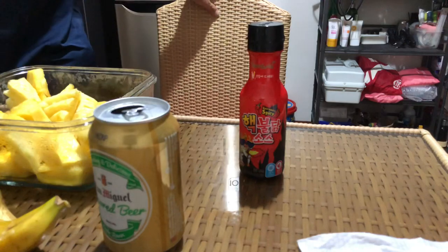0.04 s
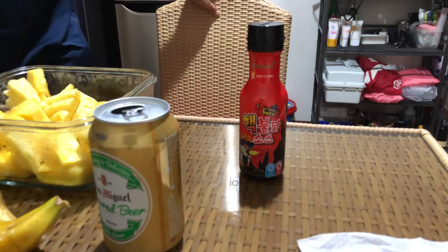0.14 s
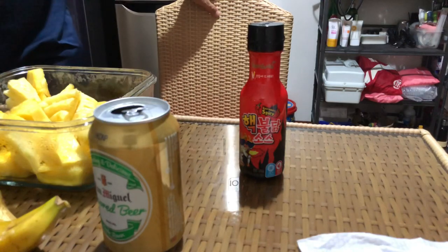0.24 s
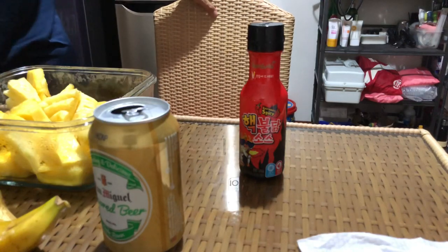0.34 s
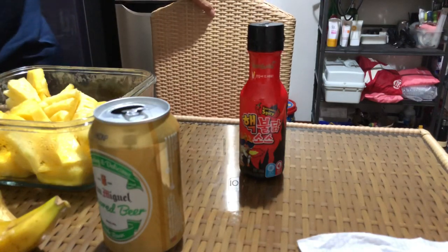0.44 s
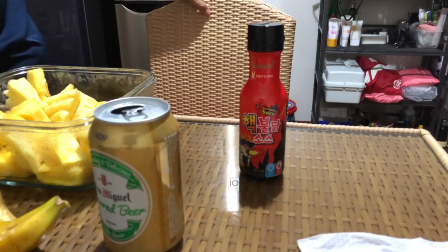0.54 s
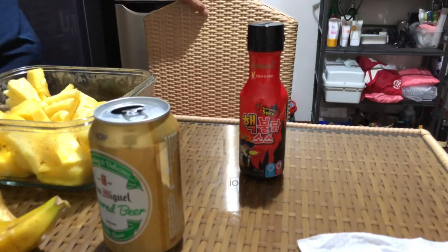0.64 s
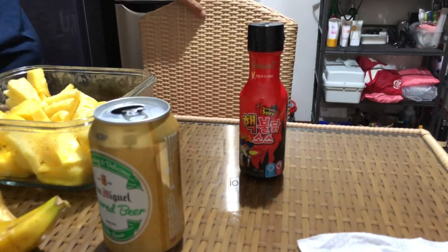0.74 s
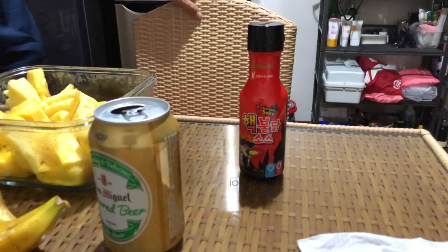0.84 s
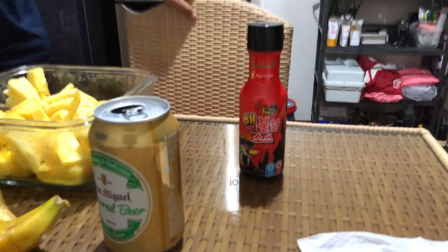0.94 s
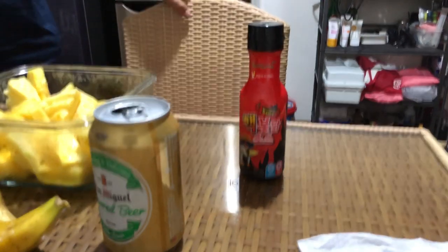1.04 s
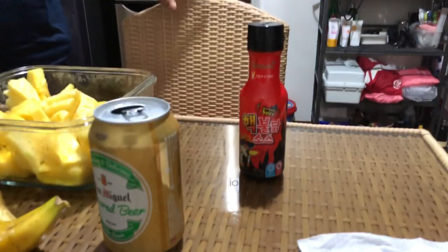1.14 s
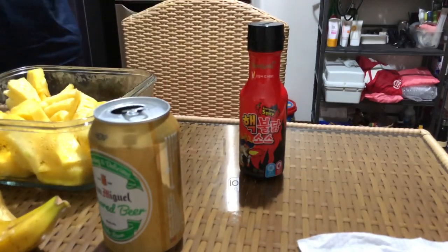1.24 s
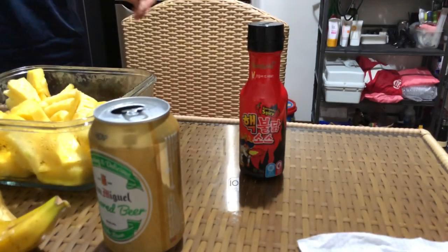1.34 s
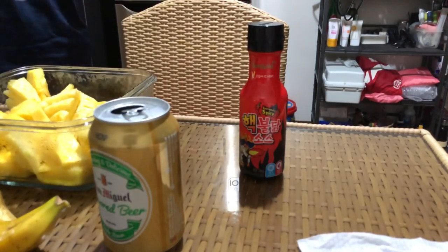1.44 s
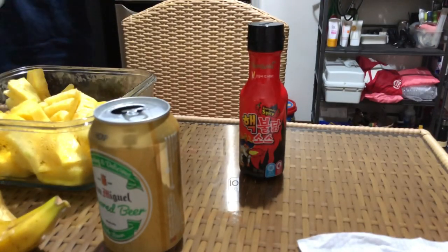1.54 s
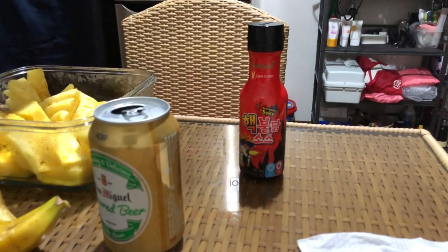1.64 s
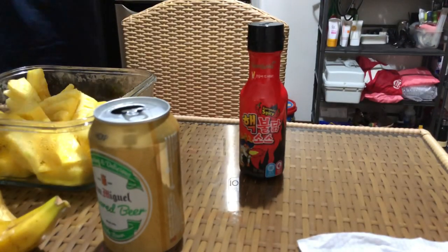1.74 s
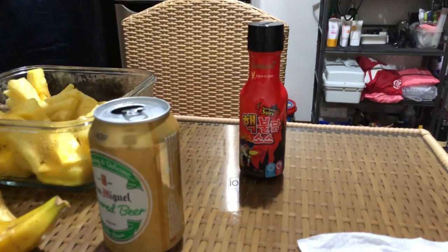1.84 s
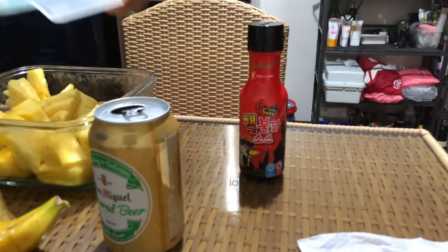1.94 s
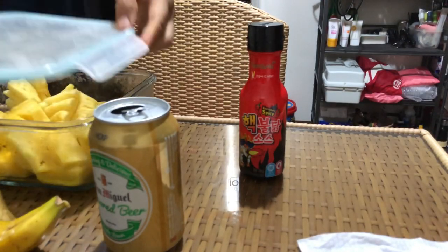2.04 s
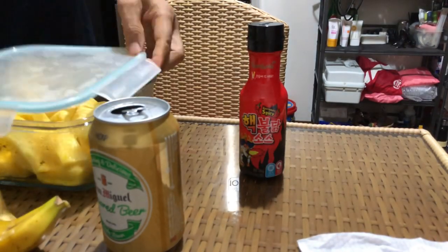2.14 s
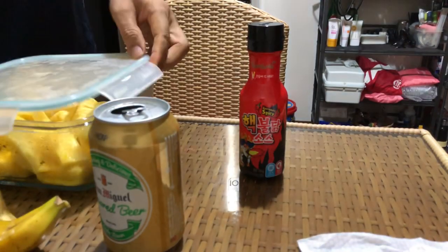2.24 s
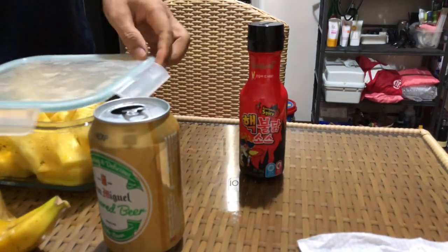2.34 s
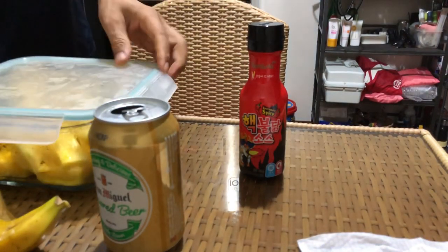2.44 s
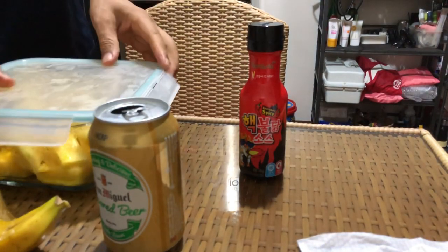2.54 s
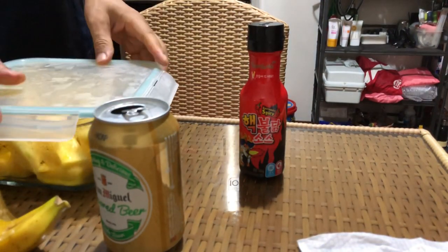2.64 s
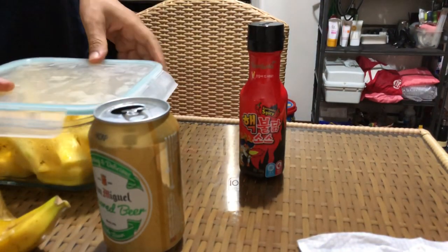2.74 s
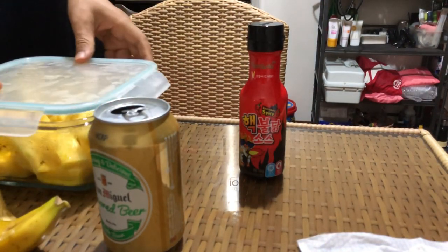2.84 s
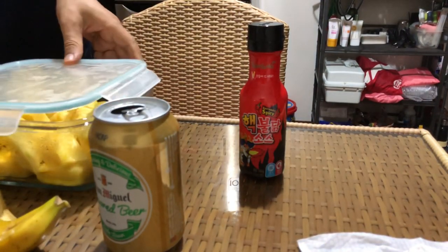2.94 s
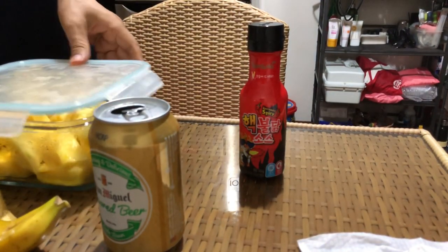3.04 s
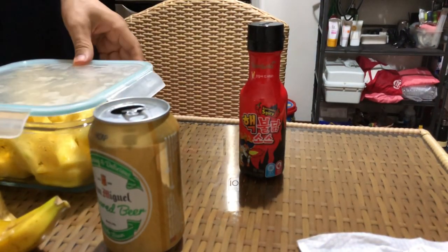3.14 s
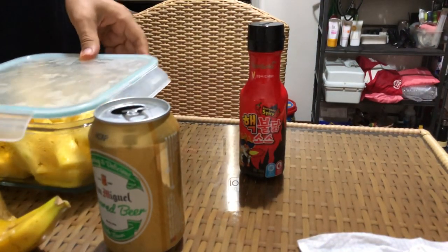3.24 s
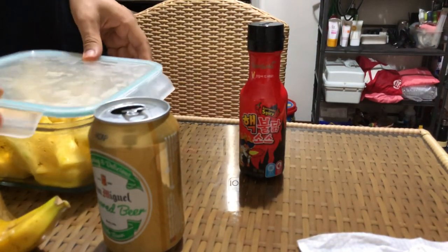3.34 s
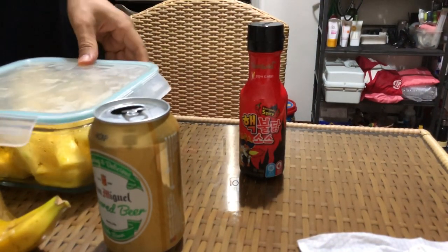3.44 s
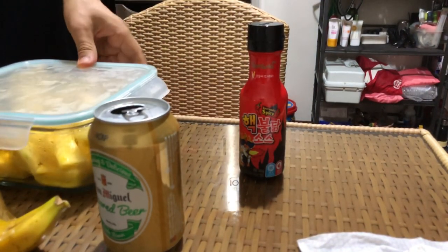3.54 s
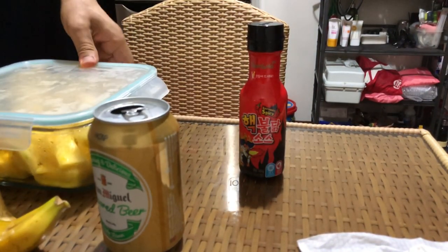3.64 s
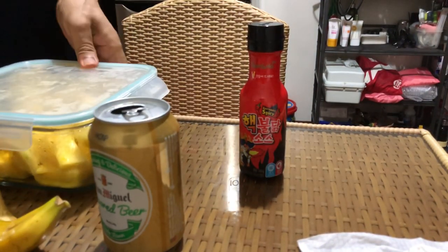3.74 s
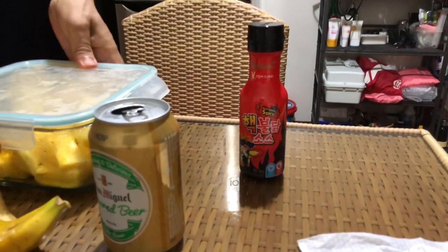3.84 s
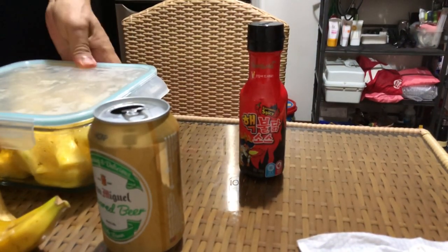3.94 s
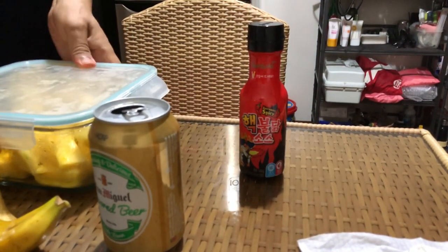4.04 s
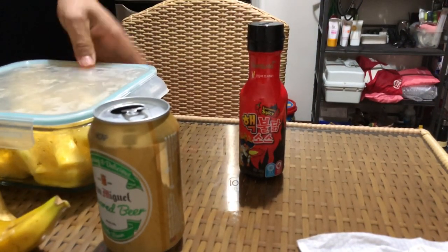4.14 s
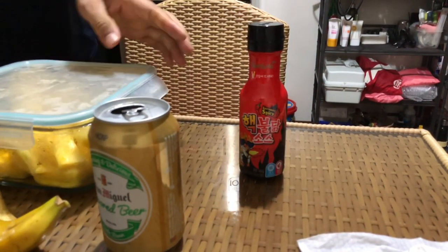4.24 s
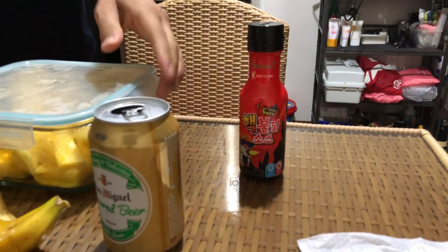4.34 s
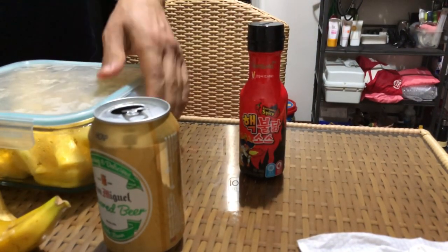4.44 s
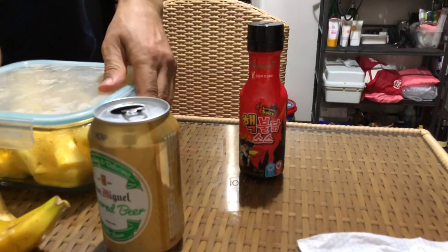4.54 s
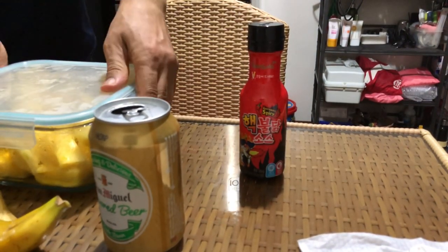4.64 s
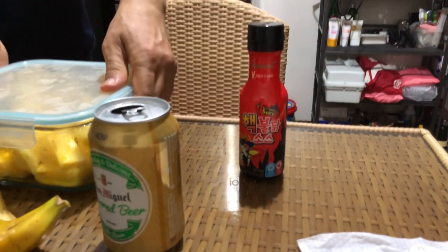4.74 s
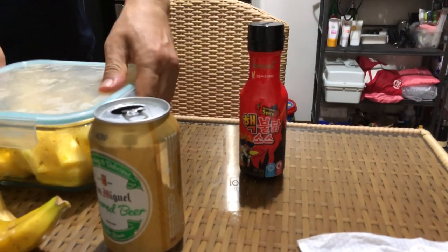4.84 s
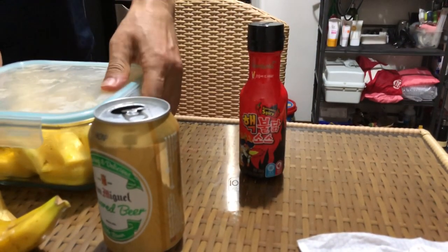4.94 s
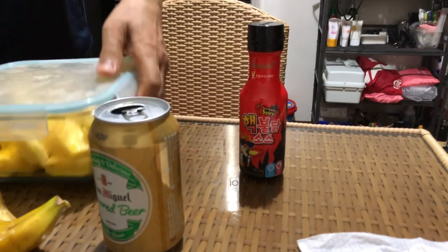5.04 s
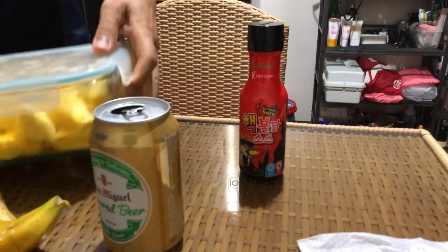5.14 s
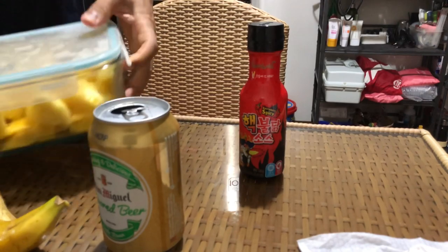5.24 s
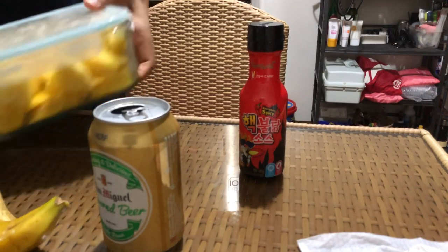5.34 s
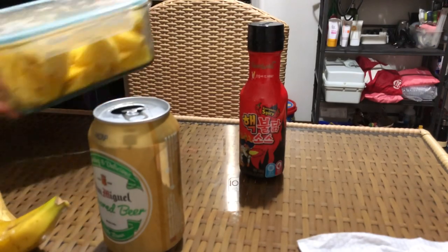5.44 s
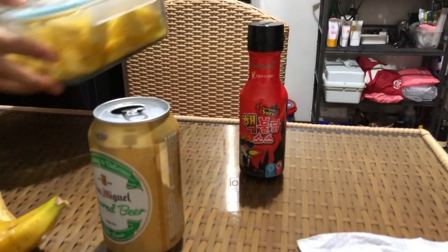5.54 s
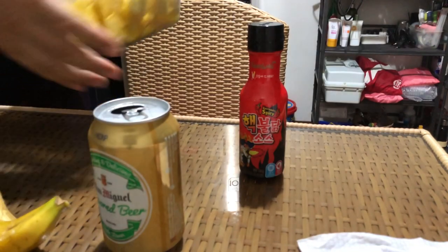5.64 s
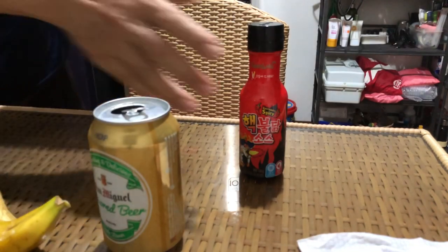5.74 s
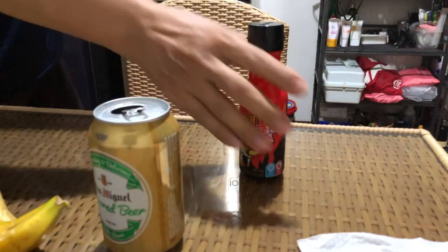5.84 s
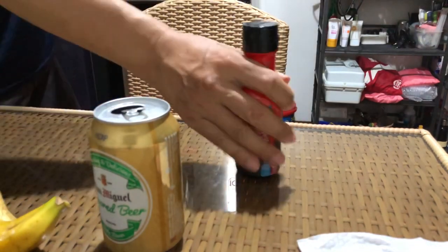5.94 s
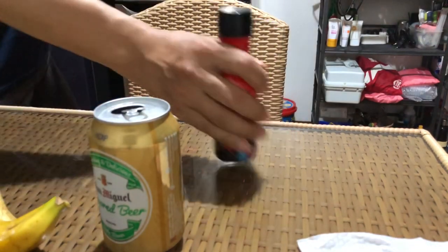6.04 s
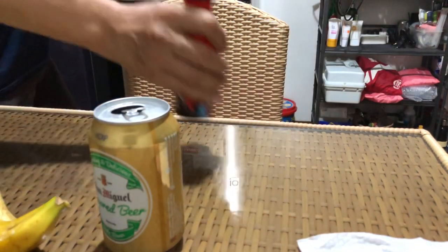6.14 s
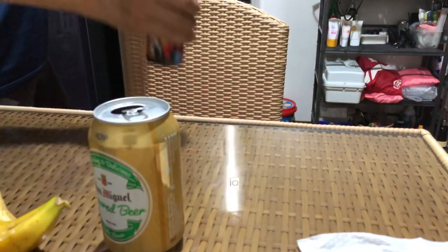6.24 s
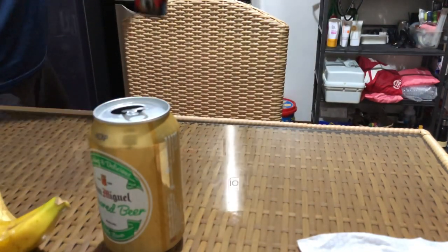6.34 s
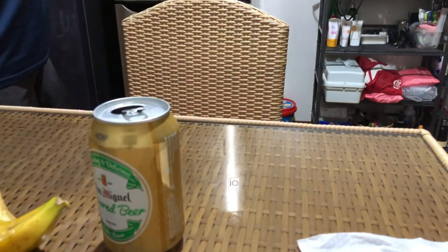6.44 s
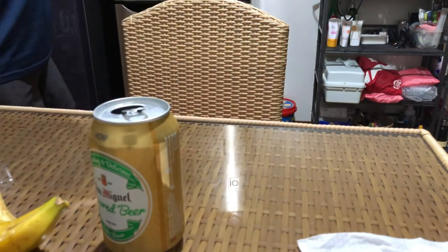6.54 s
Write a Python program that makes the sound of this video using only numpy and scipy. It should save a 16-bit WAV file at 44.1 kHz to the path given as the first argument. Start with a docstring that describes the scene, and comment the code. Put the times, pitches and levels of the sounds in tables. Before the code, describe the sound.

Close, dry sounds at a table in a small hard-walled room, over steady low rumble, faint hum and soft hiss. From 0 to 1.2 seconds a chair drags over the floor in uneven, low booming judders, with bright wicker ticks, small clicks and faint cloth brushes. A lull follows, with light clicks around 1.6 to 1.9. At 2.16 a plastic lid hits a glass dish with a loud hollow knock; rapid knocks and sliding chatter run from 2.3 to 2.9, then more at 3.0 and 3.3 to 3.45, ending in a soft table thud. Small clicks at 3.65 lead to a very sharp clip snap at 3.82 and a weaker rebound. Finger clicks at 4.5 precede the second hard snap at 4.67. Short echoes follow. Near 5.37 there is a tiny squeak, at 5.9 a light bump with clicks, and at 6.4 faint last clicks.

```python
"""In a hard-walled room a chair is dragged over the floor, then a plastic lid is rattled onto a glass dish
on a table and two clips snap shut. Noise pulses shake the chair; each knock, click and snap is a short noise
burst with decaying tones for lid, glass, table and the hollow under the lid. Ticks, short clicks, thuds, cloth
and a short squeak join in over a steady room tone; the walls answer late, and a limiter as in a phone
holds down the snaps."""
import sys
import numpy as np
from scipy import signal
from scipy.fft import rfft, irfft
from scipy.io import wavfile
from scipy.ndimage import uniform_filter1d, minimum_filter1d

SR = 44100
rng = np.random.default_rng(int(sys.argv[2]) if len(sys.argv) > 2 else 0)


def transcribe(signal):
    """Save signal, clipped to [-1, 1], as a 16-bit WAV file at the path in sys.argv[1]."""
    frames = np.atleast_2d(signal).T
    limited = np.clip(frames, -1, 1)
    pcm = np.round(limited * 32767).astype(np.int16)
    wavfile.write(sys.argv[1], SR, pcm)


N = 290883  # length of the scene in samples

# Tones of the table top. Each row: pitch in Hz, level in dB, time to fall by 60 dB in seconds.
TABLE_MODES = [(131.9, -6.5, 0.37), (216.5, -1.5, 0.24), (272, 4, 0.037), (330, -5, 0.091)]
# Chair legs judder over the floor. Each row: time in seconds, push in dB, upper boom over low boom in dB.
CHAIR_PUSHES = [(0, -61, 8), (.07, -72, -12), (.24, -57.5, 12), (.3, -50, 0), (.44, -49, -5),
                (.5, -45.5, 4), (.58, -45, 8), (.65, -56.5, 8), (.73, -45.5, 7), (.86, -48.5, -11.5),
                (.925, -43, 0.5), (1.1, -62, -11.5), (1.2, -70, 3)]


def undb(db):
    """Turn dB into a plain gain."""
    return 10 ** (np.asarray(db) / 20)


def unit(x):
    """Scale a sound to an average (RMS) level of 1."""
    return x / np.sqrt(np.mean(x ** 2))


def band(x, lo_hz, hi_hz):
    """Keep only the part of a sound between two pitches."""
    return signal.sosfilt(signal.butter(2, [lo_hz, hi_hz], "band", fs=SR, output="sos"), x)


def fade(t, t60):
    """A dying-away curve that falls by 60 dB in t60 seconds."""
    return np.exp(-np.log(1000) * t / t60)


def ring(x, modes):
    """Each mode is a decaying sine started by every push in x."""
    out = 0
    for hz, db, t60 in modes:
        pole = np.exp((2j * np.pi * hz - np.log(1000) / t60) / SR)
        out = out + undb(db) * signal.lfilter([1], [1, -pole], x).imag
    return out


def curve(table, column):
    """A dB column as gain over the whole scene, silent outside its span."""
    rows = np.array(table)
    db = np.interp(np.arange(N) / SR, rows[:, 0], rows[:, column], left=-200, right=-200)
    return undb(db)


def add(out, s, sound):
    """Mix a sound into out, starting at s seconds."""
    i = int(s * SR)
    out[i:i + len(sound)] += sound[:N - i]


def walk(rate):
    """Random levels held for 1 / rate seconds, then smoothed into a wandering line; spread near 1."""
    k = int(SR / rate)
    steps = np.repeat(rng.standard_normal(N // k + 1), k)
    return 0.78 * uniform_filter1d(uniform_filter1d(steps, k), k)[:N]


def crack(levels_db, seconds):
    """A hard contact in three bands: the rough burst heard close by, and the even click that the walls receive."""
    # Each row: lower edge in Hz, upper edge in Hz.
    crack_bands = [(1200, 3000), (3000, 7000), (7000, 16000)]
    t, noise = np.arange(2048) / SR, rng.standard_normal((3, 2048))
    close = even = 0
    for k, ((lo, hi), db) in enumerate(zip(crack_bands, levels_db)):
        length = seconds * 0.88 ** k  # higher bands are shorter
        shape = np.exp(-(t / length) ** 2) + 2.2 * fade(t, .004) + 0.45 * fade(t, 10 * length)
        burst = band(noise[k] * shape, lo, hi)
        close = close + undb(db) * burst / np.abs(burst).max()
        click = unit(band(t == 0, lo, hi)) * np.sqrt(length * SR / 8192)
        even = even + (-1) ** k * undb(db) * click
    return close, even


def tilted(db, tilt_db):
    """Crack levels of the three bands; a soft contact falls off steeply."""
    return [db, db + tilt_db, db + 2 * tilt_db]


def push(seconds):
    """A soft half-sine contact of unit area."""
    shape = np.zeros(8192)
    n = max(int(seconds * SR), 2)
    shape[:n] = np.sin(np.pi * (np.arange(n) + .5) / n)
    return shape / shape.sum()


def swell(modes):
    """A brief ring that swells in over a few cycles."""
    return ring(push(0), modes)[:2048] * (1 - fade(np.arange(2048) / SR, 0.004))


def cluster(hz, db, width, t60):
    """Five close modes scattered round one pitch: a rough ring."""
    spread = rng.standard_normal((5, 2))
    return [(hz * (1 + width * a), db + 3.7 * b, t60) for a, b in spread]


def air():
    """Room tone: a flickering rumble, a wavering hum and an upper hiss, strongest in the first second or so."""
    # Colour of the noise. Each row: pitch in Hz, relative level in dB per Hz.
    air_colour = [(15, -43.5), (25, -45.5), (48, -30), (103, -2.5), (197, 2), (304, -3.5), (330, -10),
                  (553, -16), (669, -23.5), (746, -23.5), (952, -28.5), (1600, -34), (2400, -36),
                  (11900, -49.5), (16500, -48.5)]
    # Upper hiss. Each row: time in seconds, level between 4300 and 12000 Hz in dB before the flicker.
    hiss_level = [(0, -69.5), (1, -69), (1.4, -74.5), (2.1, -74.5), (3.7, -75.5), (4.4, -79.5), (5.3, -78),
                  (6.6, -76.5)]
    low_noise_db = -57.5  # of the whole noise from which the rumble is cut
    hum_hz, hum_db = 60.1, -68.5
    hz = np.maximum(np.arange(N // 2 + 1) * SR / N, 1)
    colour = np.array(air_colour)
    shape = undb(np.interp(np.log(hz), np.log(colour[:, 0]), colour[:, 1]))
    low, high = (unit(irfft(rfft(rng.standard_normal(N)) * shape, N)) for _ in range(2))
    rumble = undb(low_noise_db) * signal.sosfilt(signal.butter(2, 700, fs=SR, output="sos"), low)
    hiss = signal.sosfilt(signal.butter(2, 700, "high", fs=SR, output="sos"), high)
    hiss *= curve(hiss_level, 1) / np.std(band(hiss, 4300, 12000))
    hum = undb(hum_db) * unit(band(rng.standard_normal(N), hum_hz - 6, hum_hz + 6))
    return undb(2.3 * walk(12)) * rumble + undb(1. * walk(6.8)) * hiss + hum


def chair():
    """Uneven stick-slip jolts ring the frame's two booms and scrape above them."""
    # Booms of the frame. Each row: pitch in Hz, half-width in Hz.
    chair_booms = [(130, 9.2), (250, 30)]
    scrape_db = -11  # under the push
    jolts = (rng.random(N) < 250 / SR) * undb(1.1 * rng.standard_normal(N))
    lean = np.sqrt(curve(CHAIR_PUSHES, 2) + 1e-9)  # shifts weight from the low to the upper boom
    out = undb(scrape_db) * unit(band(jolts + 0.67 * rng.standard_normal(N), 260, 1170))
    for (hz, width), share in zip(chair_booms, (1 / lean, lean)):
        out += share * unit(band(jolts, hz - width, hz + width))
    return curve(CHAIR_PUSHES, 1) * out


def cloth():
    """Cloth rustles faintly with the chair and brushes past: bright noise with a quick uneven flutter."""
    # Each row: middle in seconds, level in dB, half-length in seconds.
    brushes = [(0.348, -68, 0.037), (0.643, -62, 0.068), (0.947, -59, 0.026)]
    rustle_db = -35  # under the chair's push
    rustle = undb(2.5 * walk(61.7)) * band(rng.standard_normal(N), 2300, 19000)
    t = np.arange(N) / SR
    level = undb(rustle_db) * curve(CHAIR_PUSHES, 1)
    for s, db, half in brushes:
        level += undb(db) * np.exp(-((t - s) / half) ** 2)
    return level * unit(rustle)


def ticks():
    """Bright ticks, as of wicker strands letting go: a crack and a rough ring; also returns the room's feed."""
    # Each row: start in seconds, ring level in dB, ring pitch in Hz, treble over the ring in dB.
    tick_rows = [(.019, -45, 3940, -6), (0.0744, -42.5, 2920, -1), (0.083, -41, 3430, 12.5),
                 (0.6076, -56, 3800, 0), (0.6563, -37.5, 3410, 5.5), (1.134, -56.5, 2830, -12),
                 (1.1501, -34.5, 3960, 0), (1.167, -52, 3770, -1), (3.1031, -34, 3440, 18.5),
                 (3.1178, -38.5, 3230, -4)]
    # Treble of a tick. Each row: pitch in Hz, level in dB, time to fall by 60 dB in seconds.
    strand_modes = [(7650, -5.5, .03), (8870, -12.5, 0.03), (10200, -7.5, 0.025), (13440, -3, 0.02)]
    room_db = -38
    out, far = np.zeros((2, N))
    for s, db, hz, treble_db in tick_rows:
        close, even = crack([db - 23.5, db - 11, db + treble_db - 4], 0.0056)
        tone = swell(cluster(hz, db, 0.048, 0.025))
        tone = tone + undb(db + treble_db - 5.5) * swell(strand_modes)
        add(out, s, close + tone)
        add(far, s, undb(room_db) * (even + tone))
    return out, far


def clicks():
    """Fingers and small things click: a crack, a brief rough ring and a low knock; also returns the room's feed."""
    # Each row: start in seconds, crack in dB, its tilt in dB per band, ring pitch in Hz, ring level in dB.
    click_rows = [(0.112, -34.5, -9, 1340, -37), (0.269, -44.5, -8, 1060, -47),
                  (0.2947, -46, -12, 1330, -47), (0.3402, -41.5, -4, 1280, -48.5),
                  (1.607, -53, 0, 1350, -72), (1.6797, -32.5, -3, 654, -39.5),
                  (1.8236, -40.5, -3, 2750, -50), (1.9077, -51, -10, 1360, -55),
                  (3.6483, -33.5, -17.5, 980, -39.5), (3.7217, -31, -15, 1870, -31),
                  (4.48, -22, -11.5, 1220, -41.5), (4.5304, -28.5, -11.5, 1442, -39),
                  (5.0945, -49, -5, 1210, -53), (5.4717, -46.5, -5.5, 2180, -50),
                  (5.5167, -47.5, -2.5, 1180, -60), (5.8782, -64.5, 8, 1305, -60),
                  (5.9151, -42, -7, 1018, -50), (5.9303, -48, -4, 2540, -61), (6.3774, -50, 2.5, 3350, -61),
                  (6.425, -37.5, -11.5, 2154, -45.5)]
    room_db = -38
    body_hz, body_db = 503, -25  # a soft click also knocks low
    out, far = np.zeros((2, N))
    for s, db, tilt_db, hz, ring_db in click_rows:
        close, even = crack(tilted(db, tilt_db), 0.0034)
        knock = (body_hz, db - tilt_db + body_db, .03)
        tone = swell(cluster(hz, ring_db, 0.14, .011) + [knock])
        add(out, s, close + tone)
        add(far, s, undb(room_db) * (even + tone))
    return out, far


def thuds():
    """Something bumps the table top: soft pushes set its tones ringing."""
    # Each row: start in seconds, level in dB, contact time in seconds.
    thud_rows = [(0.1128, -48, 0.00067), (0.272, -54, .001), (1.682, -46, 0.00034), (2.802, -48, 0.0017),
                 (2.916, -33, 0.0042), (3.22, -41, 0.0044), (3.466, -26.5, 0.0041), (3.652, -48.5, .001),
                 (3.726, -46, .001), (4.482, -43, 0.0011), (5.9171, -32.5, .001)]
    table = np.zeros(N)
    for s, db, contact in thud_rows:
        add(table, s, undb(db) * push(max(contact, .0003)))
    return ring(table, TABLE_MODES)


def short_clicks():
    """Faint short clicks: single noise bursts, strongest in the middle band."""
    # Each row: start in seconds, level in dB.
    burst_rows = [(.215, -53), (0.647, -43.5), (0.666, -35), (1.162, -37), (1.62, -51), (1.671, -41.5),
                  (2.349, -35), (2.378, -28), (2.537, -22.5), (2.702, -35), (3.359, -32), (3.772, -60),
                  (3.79, -42.5), (3.799, -35.5), (3.811, -41), (4.652, -25.5), (4.654, -31.5),
                  (5.338, -60.5), (5.616, -56), (6.44, -66)]
    out = np.zeros(N)
    for s, db in burst_rows:
        add(out, s, crack([db - 6.5, db, db - 22], 0.0027)[0])
    return out


def boom(db, hz, contact):
    """The rim settles in a quick run of touches that pump up the air under the lid."""
    # Each row: multiple of the hollow pitch, level in dB, time to fall by 60 dB in seconds.
    hollow_modes = [(1, 6.5, 0.055), (1.17, 2.5, 0.084), (.85, -15, 0.037)]
    t = np.arange(8192) / SR
    touches = (1 + 0.28 * rng.standard_normal(8192)) * np.sin(2 * np.pi * hz * t)
    touches *= np.exp(-(t / (2 * contact)) ** 4)
    sound = ring(touches, [(hz * k, d, t60) for k, d, t60 in hollow_modes])
    return undb(db) * sound / np.abs(sound).max()


def lid():
    """Knocks and sliding chatter of the lid on the rim ring plate, hollow, glass and table; also the room's feed."""
    # Lid against the rim. Each row: start in seconds, crack in dB, its tilt in dB per band, hollow in dB,
    # hollow pitch in Hz, ring of the lid plate over the crack in dB.
    knocks = [(2.1587, -12, -9, -17, 522, -8.5), (2.2071, -16.5, -7, -19.5, 470, 1.5),
              (2.239, -34, -8, -38, 537, 5), (2.34, -33, -11, -28, 530, 6),
              (2.3631, -26, -2, -18.5, 504, -7.5), (2.3853, -20, -14, -16.5, 479, -2.5),
              (2.4083, -26.5, -7, -24, 480, 4.5), (2.4246, -24, -9.5, -25, 640, 1.5),
              (2.4531, -24.5, -3, -23.5, 504, -5), (2.474, -27, -8, -31, 330, -10.5),
              (2.4974, -30.5, -5.5, -58, 474, -7), (2.5308, -23, -3, -20.5, 502, 0),
              (2.5608, -31.5, -7, -33, 570, -5), (2.6057, -24.5, -5, -35, 552, -7),
              (2.6229, -37, -7, -25, 530, 7), (2.6929, -33.5, -10, -19.5, 481, 4.5),
              (2.753, -33.5, -9.5, -27, 480, -0.5), (2.799, -44, -8, -35.5, 476, 5),
              (2.8338, -54, -12, -36.5, 508, 8), (2.8834, -18, -1, -28, 440, -13),
              (2.8976, -12.5, -14.5, -16.5, 501, -2.5), (2.9145, -30, -6, -34.5, 427, 5.5),
              (3.0268, -21, -5.5, -19, 429, -10.5), (3.0519, -22.5, -2.5, -15.5, 426, 3),
              (3.1632, -36.5, -6.5, -48, 386.4, -2.5), (3.2155, -42.5, -13.5, -35, 480, -9.5),
              (3.323, -14.5, -6.5, -17.5, 492, -5.5), (3.3708, -12.5, -1.5, -13.5, 460, -4.5),
              (3.4176, -26, -9.5, -18.5, 330, 7.5), (3.4259, -15.5, -5.5, -22, 512, -7),
              (3.463, -38, -11, -25, 330, 8)]
    # The lid chatters while it slides on the rim. Each row: time in seconds, level in dB.
    slide = [(2.165, -50), (2.206, -46), (2.326, -48), (2.368, -37.5), (2.762, -48.5), (2.944, -63),
             (3.026, -33), (3.17, -47.5), (3.328, -59.5), (3.6, -56)]
    # Tones of plate and glass. Each row: pitch in Hz, level in dB, time to fall by 60 dB in seconds.
    plate_modes = [(970, -0.5, 0.03), (999, -19, 0.19), (715, -7, 0.042), (1362, -13.5, 0.075),
                   (1850, -25.5, 0.14)]
    glass_modes = [(2363, -9.5, 0.24), (1455, -20, .15)]
    settle_s = .003  # sets how long the touches last
    glass_db, table_db = -15, -34.5  # glass under the lid plate, table under the hollow
    out, far, glass, table = np.zeros((4, N))
    for s, db, tilt_db, hollow_db, hz, ring_db in knocks:
        close, even = crack(tilted(db, tilt_db), 0.0045)
        add(out, s, close)
        add(far, s, undb(-42.5) * even)
        body = boom(hollow_db, hz, settle_s)
        # each knock's plate tones vary a little in pitch and level
        spread = rng.standard_normal((len(plate_modes), 2))
        modes = [(f * (1 + 0.007 * a), d + 3 * b, t60) for (f, d, t60), (a, b) in zip(plate_modes, spread)]
        body += undb(db + ring_db) * ring(push(0.00015), modes)
        add(out, s + 0.001, body)
        add(far, s, undb(-44.5) * body)
        add(glass, s, undb(db + ring_db + glass_db) * push(0))
        add(table, s + 0.0016, undb(hollow_db + table_db) * push(0.0042))
    # sliding: about 300 tiny taps a second, of random strength and sign
    grains = (rng.random(N) < 300 / SR) * undb(4.3 * rng.standard_normal(N)) * rng.choice([-1, 1], N)
    chatter = ring(grains, [(480, 1.0, 0.0073), (415, -6.5, 0.066), (570, -15.5, 0.013), (999, 0.5, 0.03)])
    out += curve(slide, 1) * (unit(chatter) + undb(-23) * unit(band(grains, 1200, 5600)))
    return out + ring(glass, glass_modes) + ring(table, TABLE_MODES), far


def snaps():
    # Each row: start in seconds, 1.2-3 kHz in dB, 3-7 kHz in dB, 7-16 kHz in dB, table in dB, room share in dB.
    snap_rows = [(3.8213, -3.5, 2.5, 0, -22.5, -35), (3.8765, -15, -10, -10, -41.5, -44),
                 (4.6612, -11, -6.5, -15, -34, -40.5), (4.672, -0.5, 2, 4, -21.5, -36)]
    # Each row: pitch in Hz, level in dB, time to fall by 60 dB in seconds.
    clip_modes = [(895, -33, 0.023), (1850, -14, 0.02), (3610, -4, 0.014), (6930, -15.5, 0.0065),
                  (10440, -0.5, 0.0026), (13710, -4.5, 0.0019)]
    out, far, table = np.zeros((3, N))
    for s, low, mid, high, table_db, wet_db in snap_rows:
        close, even = crack([low, mid, high], 0.0034)
        add(out, s, close)
        flap = undb(low) * ring(push(0), clip_modes[:2])
        flap = flap + undb(mid) * ring(push(0), clip_modes[2:4])
        flap = flap + undb(high) * ring(push(0), clip_modes[4:])
        flap = flap[:2048]
        add(out, s, undb(-4) * flap)
        add(far, s, undb(wet_db) * flap)
        add(far, s + .004, undb(wet_db - 3.5) * even)  # the even click reaches the room 4 ms after the ring
        add(table, s + 0.0032, undb(table_db) * push(0.0035))
    return out + ring(table, TABLE_MODES), far


def squeak():
    """A fast stick-slip tone with two overtones and a trembling pitch that steps down."""
    # Levels of the tone and its two overtones in dB.
    overtones_db = [0.5, -8.5, -18]
    start_s, length_s, level_db = 5.366, .038, -51
    first_hz, slack_hz, slack_s = 672, 566, .023  # the pitch steps down this long after the start
    t = np.arange(N) / SR - start_s
    hz = slack_hz + (first_hz - slack_hz) / (1 + np.exp(np.clip((t - slack_s) / 0.0042, -20, 20)))
    phase = 2 * np.pi * np.cumsum(hz * (1 + 0.024 * walk(300))) / SR
    tone = sum(undb(db) * np.sin((k + 1) * phase) for k, db in enumerate(overtones_db))
    gate = uniform_filter1d(1. * ((t > 0) & (t < length_s)), 150)
    return np.sqrt(2) * undb(level_db) * gate * tone


def room(x):
    """Nearby things scatter a little; the walls answer after a gap, strongest at first; each octave dies at its own rate."""
    # Each row: band centre in Hz, time to fall by 60 dB in seconds, level in dB.
    room_bands = [(180, 0.73, 4.5), (352, 0.39, 3.5), (736, 0.57, -1), (1400, 0.57, -1.5),
                  (2800, 0.56, -7.5), (5600, 0.47, -6.5), (10900, 0.37, -7.5)]
    gap_s, near_db = 0.0088, -17
    early_db, early_t60_s = -1, 0.061  # extra strength of the first answers
    t = np.arange(SR) / SR
    tail = 0
    for hz, t60, db in room_bands:
        noise = band(rng.standard_normal(SR), hz / np.sqrt(2), hz * np.sqrt(2))
        tail = tail + undb(db) * fade(t, t60) * noise
    late = np.maximum(t - gap_s, 0)
    walls = (1 - np.exp(-late / 0.00035)) * (1 + undb(early_db) * fade(late, early_t60_s))
    # single reflections stand out early and melt together later
    grain = undb(0.6 * walk(500)[:SR] * fade(t, 0.65))
    return signal.fftconvolve(x, tail * grain * (undb(near_db) + walls))[:N]


def scene():
    """Mix all sources; ticks, clicks, lid, snaps and squeak also feed the room."""
    tick, tick_far = ticks()
    click, click_far = clicks()
    plastic, plastic_far = lid()
    snap, snap_far = snaps()
    squeal = squeak()
    echoes = room(tick_far + click_far + plastic_far + snap_far + undb(-41.5) * squeal)
    hits = tick + click + thuds() + short_clicks() + plastic + snap + echoes
    # small things radiate no deep bass
    hits = signal.sosfilt(signal.butter(3, 80, "high", fs=SR, output="sos"), hits)
    return (hits + squeal + chair() + cloth() + air())[None]


def record(dry):
    """A look-ahead limiter ducks the loudest peaks and holds a moment; then the top is cut."""
    limit_db, hold_s, ramp_s, top_hz = -3., .01, .002, 16200
    want_db = np.minimum(limit_db - 20 * np.log10(np.abs(dry) + 1e-9), 0)
    hold, ramp = int(hold_s * SR), int(ramp_s * SR)
    held = minimum_filter1d(want_db, hold + ramp, origin=(hold - ramp) // 2)
    loud = dry * undb(uniform_filter1d(held, ramp))
    return signal.sosfilt(signal.ellip(10, .2, 70, top_hz, fs=SR, output="sos"), loud)


dry = scene()
out = record(dry)
transcribe(out)
```